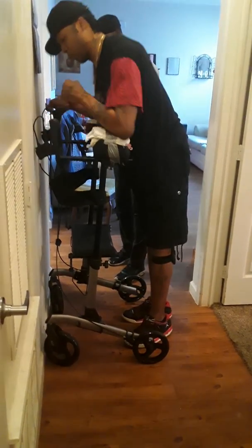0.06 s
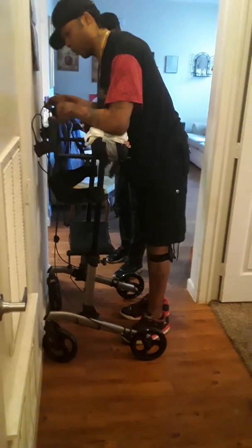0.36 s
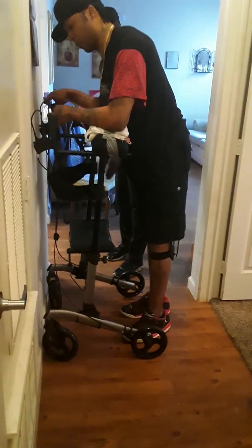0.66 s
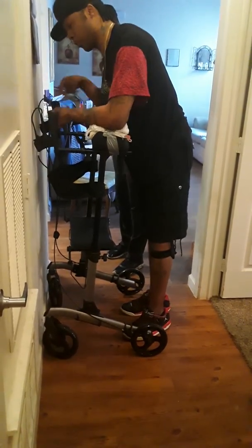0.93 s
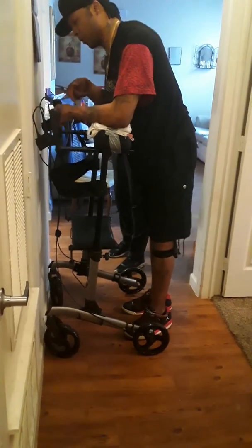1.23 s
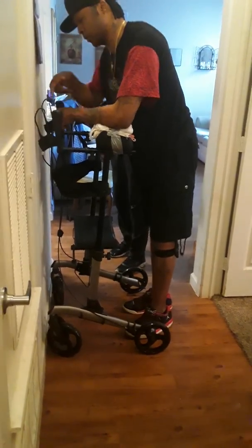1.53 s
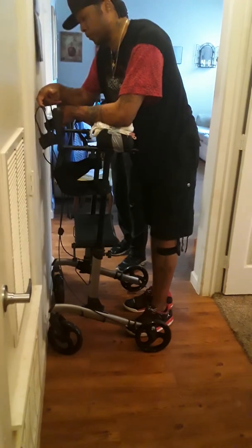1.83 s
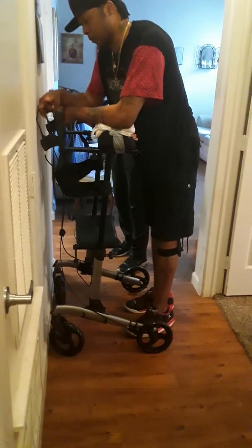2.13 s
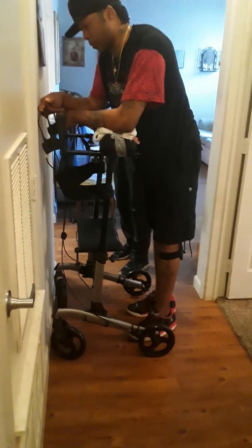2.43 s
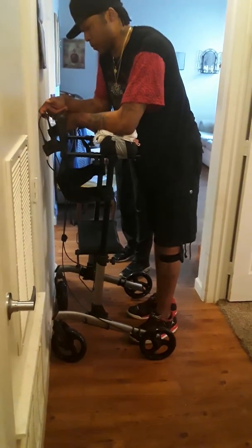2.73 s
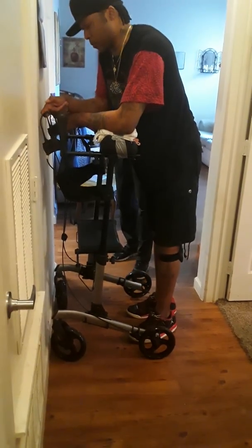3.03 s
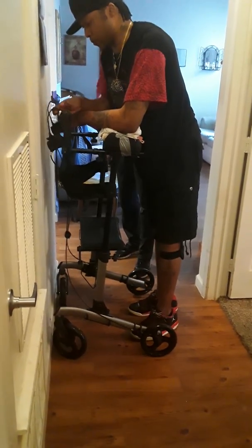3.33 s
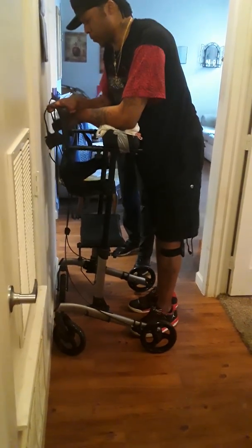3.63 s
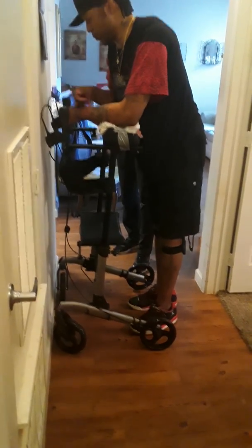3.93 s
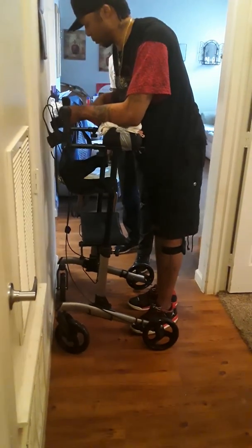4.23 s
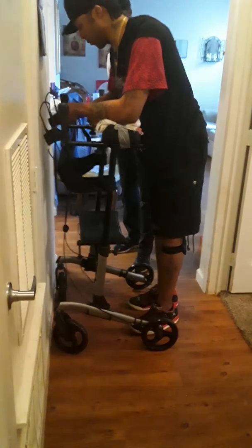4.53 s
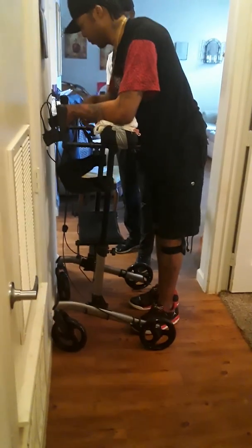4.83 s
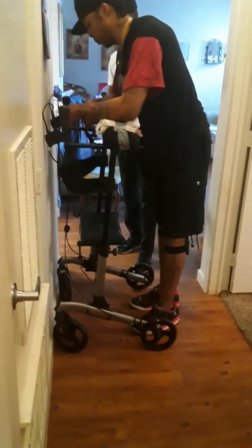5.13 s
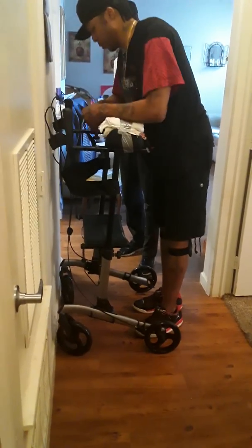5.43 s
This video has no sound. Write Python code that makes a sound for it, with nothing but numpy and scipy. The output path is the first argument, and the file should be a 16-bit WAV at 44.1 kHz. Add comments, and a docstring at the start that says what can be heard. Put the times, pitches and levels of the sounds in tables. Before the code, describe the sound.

A knock and thump on a wheeled walker open the scene, followed within a second by a strong clack of its latch. After a quiet stretch of small ticks and rustling cloth, the latch snaps crisply, and several softer knocks rattle the frame and thud into the wooden floor. The stereo microphone picks up short hallway reverberation and a faint, steady background of fan and electrical hum.

```python
"""A folding wheeled walker ticks, knocks and snaps as hands work its levers, post and latch.
Each impact excites a noisy clatter of small parts and the damped normal modes of tube frame and latch;
the wooden floor takes up the bass as a thump. A near wall reflects the clatter; the hallway reverberates.
Sleeves and fingers rustle by friction, over a faint fan, mains hum and the microphones' own noise."""
import sys
import numpy as np
from scipy import signal
from scipy.io import wavfile

SR = 44100
rng = np.random.default_rng(int(sys.argv[2]) if len(sys.argv) > 2 else 0)


def transcribe(u):
    """Save the signal u as a 16-bit wav file named by the first command-line argument.

    u: samples, shape (n,) or (channels, n), limited to [-1, 1]; the rate is SR.
    q: integer samples, one column per channel.
    """
    v = np.clip(np.atleast_2d(u).T, -1, 1)
    q = np.round(v * 32767).astype(np.int16)
    wavfile.write(sys.argv[1], SR, q)


N = 245637

# Impacts on the walker: t/s, level/dB, floor thump/dB, pitch of the part f/Hz,
# softness as treble fall/(dB per octave), rise time/s, ring that the hands allow/dB
IMPACTS = [(0.027, -29.5, -46, 1090, 6.5, 0.0038, -6), (0.046, -32.5, -28.5, 560, 4.5, 0.0013, -4.5),
           (0.09, -53, -35, 294, 1, 0.0031, -10), (0.595, -64, -54, 490, 2, 0.0029, -2),
           (0.888, -42, -57, 2840, 3.2, 0.0024, 0), (0.938, -22, -41, 345, 3, 0.0017, -1.5),
           (0.941, -26, -44, 1800, 7, 0.00056, -3.5), (1.807, -66, -54, 696, 1, 0.0037, -4),
           (1.826, -59.5, -49, 191, 3, .0064, 1), (1.893, -57.5, -59, 1400, 5.9, 0.0095, 0.5),
           (1.925, -61, -66, 400, 3.5, 0.0038, 0), (2.015, -65, -71, 2360, 19, 0.0049, 9.5),
           (2.165, -67, -65, 2000, -0.5, .0056, 0.5), (2.384, -59, -59, 2050, 4.5, 0.0013, 2),
           (2.392, -53.5, -51, 397, 9.5, 0.0021, -10.5), (2.412, -52, -53, 210, 7, 0.007, -3.5),
           (2.836, -64.5, -72, 3460, 1, 0.0067, 4), (2.874, -57.5, -68, 1020, 0.5, 0.003, -17),
           (2.878, -57, -76, 4770, 6, 0.0062, 0), (3.115, -53.5, -67, 980, 6, 0.0009, -2.5),
           (3.238, -64, -75, 1390, 5, 0.0032, 0), (3.351, -55.5, -61, 830, 6.5, .0015, 1.5),
           (3.861, -43, -63, 3340, 2, 0.0083, 2.5), (3.88, -27, -46, 1770, -0.4, 0.0013, -2),
           (3.89, -28, -36, 4140, -1, 0.0014, -1), (4.588, -36.5, -52, 760, 11, .001, -6.5),
           (4.621, -54.5, -67, 400, 2, .0052, -5), (4.654, -38, -38, 543, 7, 0.0039, -10),
           (4.728, -38, -31, 478, 6, 0.00071, -7), (4.757, -44.5, -36.5, 1190, 2.5, 0.0022, -4.5),
           (4.881, -55.5, -62, 2800, 21, 0.0033, -2.5), (4.943, -42.5, -63, 1111, 2.46, 0.00031, -4.5),
           (5.228, -62, -73, 3930, -5, 0.0028, -1), (5.487, -55.5, -58, 288, 4.5, 0.0077, 0)]
# Spectral density of the clatter: f/Hz, relative level/dB
CLATTER_SPECTRUM = [(30, -23), (55, 2.5), (92, -1.5), (145, -4), (200, 9.5), (340, 8.5), (600, 1.5),
                    (800, 2), (1100, 4), (1450, -2), (2000, 1.5), (3100, -1), (4100, -4.5), (5300, -7),
                    (8000, -12.5), (15000, -18)]
# Normal modes of tube frame (low) and latch (high): f/Hz, level/dB re the impact, T60/s
WALKER_MODES = [(137.8, -6.5, 0.32), (178.7, -15.5, 0.44), (206.6, -6, 0.4), (268.7, -3.5, 0.55),
                (306, -11, 0.5), (331, -7, 0.43), (374, -9, 0.29), (428.5, -11.5, 0.27), (570, -20, 0.4),
                (612, -15, 0.39), (675, -10.5, 0.3), (888, -10.5, 0.39), (1072, -12, 0.22),
                (1117, -15, 0.36), (1177, -16, 0.32), (1802, -10, 0.049), (1850, -17, 0.18),
                (1968, -16.5, 0.27), (1947, -18.5, 0.22), (2300, -8.5, 0.11), (2480, -15, 0.23),
                (3868, -19.5, 0.22), (3900, -29, 0.27), (4120, -9, 0.057), (4498, -12, 0.24),
                (7740, -19.5, 0.2), (8220, -23, 0.27)]
# Early decay of the small parts and near walls: f/Hz, T60/s
EARLY_DECAY = [(60, 0.2), (250, 0.4), (800, 0.29), (2500, 0.25), (7000, 0.26), (14000, 0.11)]
# Reverberation of the hallway: f/Hz, T60/s
HALLWAY_DECAY = [(60, 0.96), (250, 1), (800, 0.74), (2500, 1), (7000, 0.48), (14000, 0.48)]
# Build-up of the clatter, slowest in the bass: f/Hz, time constant/s
BUILD_UP = [(60, 0.013), (140, 0.012), (300, 0.0092), (800, 0.00022), (3000, 0.00044), (12000, 0.0017)]
# Likeness of the left and right channels: f/Hz, correlation coefficient
CORRELATION = [(60, .98), (150, .985), (250, .96), (370, .8), (550, .2), (1000, -.05), (2500, 0),
               (12000, 0)]
# Stereo balance of the walker: f/Hz, level left minus right/dB
BALANCE = [(100, 1), (400, -1), (1000, 2), (2000, -4), (4000, -3.5), (8000, 3.5), (13000, -2)]
# Arm movements, each a swell of rustle: centre t/s, duration/s, peak level/dB
ARM_SWELLS = [(0.51, 0.53, -57), (2.021, 0.29, -62.5), (2.66, 0.63, -79), (3.34, 0.33, -61.5),
              (4.76, 0.14, -52), (5.24, 0.35, -58)]
# Spectral density of rubbing cloth and skin: f/Hz, relative level/dB
RUSTLE_SPECTRUM = [(30, -12), (60, -5), (150, 2.5), (280, 2), (500, -2), (1000, -0.5), (2000, -6.5),
                   (3500, -4), (5500, -13.5), (8500, -23), (15000, -20.5)]
# Spectral density of the fan's rush: f/Hz, relative level/dB
FAN_SPECTRUM = [(30, -27), (55, -14), (110, -13.5), (170, -21.5), (250, 5), (380, -17.5), (520, -10),
                (1000, -16), (2500, -17), (4500, -26.5), (8500, -28), (12000, -26), (15500, -19.5)]
# Harmonics of the mains hum: f/Hz, level/dB
HUM_HARMONICS = [(120, -70.5), (240, -68.5), (360, -70), (480, -82)]

BAND_EDGES = np.geomspace(28, 16500, 24)   # f/Hz
BAND_HZ = np.sqrt(BAND_EDGES[1:] * BAND_EDGES[:-1])
TIME = np.arange(N) / SR
AGE = np.arange(int(.7 * SR)) / SR   # t/s since an impact
ONSET_SAMPLES = int(.05 * SR)   # an impact's level is set over this span


def clatter(gain_db=5, crack_db=5, crack_t60=0.018, hallway_db=-20):
    """Modal overlap: small parts ring as decaying noise, between a brief crack and the reverberant tail."""
    out, bands, envelopes = np.zeros((2, N)), noise_bands(), []
    colour = from_db(gain_db) * band_gains(CLATTER_SPECTRUM)
    for hz in BAND_HZ:
        early = decay(at_hz(EARLY_DECAY, hz))
        late = from_db(hallway_db) * decay(at_hz(HALLWAY_DECAY, hz))
        crack = from_db(crack_db) * decay(crack_t60)
        envelopes.append(stereo_gains(hz) * rise(at_hz(BUILD_UP, hz)) * (np.hypot(early, late) + crack))
    starts = rng.integers(0, N - len(AGE), len(IMPACTS))
    for start, (t, level_db, thump_db, pitch, softness, rise_s, _) in zip(starts, IMPACTS):
        sound, onset = 0, rise(rise_s)
        for hz, band, envelope, share in zip(BAND_HZ, bands, envelopes, colour):
            burst = band[:, start:start + len(AGE)] * envelope * onset
            gain = share * impact_gain(hz, level_db, thump_db, pitch, softness)
            sound = sound + gain * burst / rms(burst[:, :ONSET_SAMPLES])
        add(out, t, wall_reflection(part_resonance(sound, pitch)))
    return out


def frame_and_latch_modes(scatter_db=4.46, build_cycles=3.3, split_hz=5.06, twin_share=0.42):
    """Free vibration: each impact excites the damped normal modes, with random strength and phase."""
    out = np.zeros((2, N))
    chance = rng.standard_normal((len(IMPACTS), len(WALKER_MODES), 3))
    for k, (hz, mode_db, t60) in enumerate(WALKER_MODES):
        build_up = rise(build_cycles / hz)   # the blow takes a few cycles to spread through the frame
        beating = 1 + twin_share * np.exp(2j * np.pi * split_hz * AGE)   # a tube bends in two planes
        wave = np.exp(2j * np.pi * hz * AGE) * beating * build_up * decay(t60)
        wave = wave * stereo_gains(hz) / rms(wave.imag[:ONSET_SAMPLES])
        phase_spread = np.arccos(at_hz(CORRELATION, hz))   # reflections shift left against right
        for impact, (strength, phase, shift) in zip(IMPACTS, chance[:, k]):
            t, level_db, thump_db, pitch, softness, rise_s, ring_db = impact
            gain = impact_gain(hz, level_db, thump_db, pitch, softness)
            gain *= from_db(mode_db + ring_db + scatter_db * strength)
            angle = np.pi * phase + phase_spread * shift * np.array([[.5], [-.5]])
            add(out, t, gain * (np.exp(1j * angle) * wave).imag * rise(rise_s))
    return out


def impact_gain(hz, level_db, thump_db, pitch, softness, bass_db_per_octave=8.5, floor_hz=159):
    """Radiation is weak below a part's pitch, a soft touch excites little treble, the floor adds bass."""
    octaves = np.log2(hz / pitch)
    part = from_db(level_db + bass_db_per_octave * min(octaves, 0) - softness * max(octaves, 0))
    floor = from_db(thump_db) / np.hypot(1, (hz / floor_hz) ** 4)
    return np.hypot(part, floor)


def part_resonance(sound, hz, boost_db=2.5, q=12):
    """Resonance: the touched part favours frequencies near its own."""
    resonant = signal.lfilter(*signal.iirpeak(hz, q, fs=SR), sound)
    return sound + (from_db(boost_db) - 1) * resonant


def wall_reflection(sound, share=0.42, delay_range_s=(0.0011, 0.0042)):
    """Comb filtering: the near wall's echo interferes with the direct sound and makes it a little hollow."""
    lag = int(SR * rng.uniform(*delay_range_s))
    echo = np.pad(sound, ((0, 0), (lag, 0)))[:, :len(AGE)]
    echo = signal.sosfilt(signal.butter(2, 400, "high", fs=SR, output="sos"), echo)
    return (sound + share * echo) / np.hypot(1, share)


def rustle(finger_db=-64.5, pause_at_s=1.68, pause_s=0.27, grain_db=1.5, grain_hz=70):
    """Friction: cloth and skin slip unevenly; arm movements swell over fingers that pause only once."""
    fingers = from_db(finger_db) * (1 - bell_curve(pause_at_s, pause_s))
    arm_power = sum(from_db(db) ** 2 * bell_curve(t, length) for t, length, db in ARM_SWELLS)
    envelope = np.sqrt(fingers ** 2 + arm_power)
    return shaped_noise(RUSTLE_SPECTRUM) * envelope * from_db(grain_db * drift(grain_hz))


def fan(level_db=-65.5):
    """Broadband flow noise: a fan moves the air with a soft, steady rush."""
    return from_db(level_db) * shaped_noise(FAN_SPECTRUM)


def mains_hum(waver_db=2.05, waver_hz=3.79):
    """Harmonic series: the mains hums in four partials, each wavering slightly in level."""
    hum = 0
    for hz, db in HUM_HARMONICS:
        amplitude = np.sqrt(2) * from_db(db + waver_db * drift(waver_hz))
        hum = hum + amplitude * np.sin(2 * np.pi * (hz * TIME + rng.random()))
    return hum


def microphone_noise(level_db=-72, band_hz=(55, 328)):
    """Self-noise: each capsule adds an independent, faint low rush."""
    white = rng.standard_normal((2, N))
    rush = signal.sosfilt(signal.butter(2, band_hz, "band", fs=SR, output="sos"), white)
    return from_db(level_db) * rush / rms(rush)


def noise_bands():
    """Partial coherence: stereo noise bands of unit rms, alike left and right only in the bass."""
    white, bands = rng.standard_normal((2, 2, N)), []
    for k, hz in enumerate(BAND_HZ):
        bandpass = signal.butter(2, BAND_EDGES[k:k + 2], "band", fs=SR, output="sos")
        mid, side = signal.sosfilt(bandpass, white[k % 2])
        alike = at_hz(CORRELATION, hz)
        band = np.sqrt(1 + alike) * mid + np.sqrt(1 - alike) * side * np.array([[1], [-1]])
        bands.append(band / rms(band))
    return bands


def band_gains(spectrum):
    """Band power is spectral density times bandwidth; the gains are scaled to a total power of 1."""
    gain = from_db(at_hz(spectrum, BAND_HZ)) * np.sqrt(np.diff(BAND_EDGES))
    return gain / np.linalg.norm(gain)


def shaped_noise(spectrum):
    """Spectral shaping: a weighted sum of noise bands."""
    return sum(gain * band for gain, band in zip(band_gains(spectrum), noise_bands()))


def rise(time_constant):
    """Exponential approach to full amplitude."""
    return 1 - np.exp(-AGE / time_constant)


def decay(t60):
    """Exponential damping: a fall of 60 dB in t60."""
    return np.exp(-np.log(1000) * AGE / t60)


def bell_curve(centre, width):
    """Gaussian pulse in time, with its full width taken at 1/e."""
    return np.exp(-(2 * (TIME - centre) / width) ** 2)


def drift(rate_hz):
    """Random fluctuation with a spread of about 1."""
    return np.interp(TIME * rate_hz, np.arange(2000), rng.standard_normal(2000))


def stereo_gains(hz):
    """Level difference, split evenly between left and right."""
    return from_db(at_hz(BALANCE, hz) * np.array([[.5], [-.5]]))


def at_hz(table, hz):
    """Interpolation on a logarithmic frequency axis."""
    f, value = np.transpose(table)
    return np.interp(np.log(hz), np.log(f), value)


def from_db(db):
    """Amplitude ratio of a level."""
    return 10 ** (np.asarray(db) / 20)


def rms(x):
    """Root-mean-square amplitude."""
    return np.sqrt(np.mean(x ** 2) + 1e-24)


def add(out, t, sound):
    """Superposition of a sound that starts at time t."""
    start = round(t * SR)
    out[:, start:start + sound.shape[1]] += sound[:, :N - start]


def scene():
    """Superposition of the walker, the rustle and the hallway's background."""
    return clatter() + frame_and_latch_modes() + rustle() + fan() + mains_hum()


def record(dry, cutoff_hz=15900):
    """Band limiting: sound and microphone noise pass through a steep low-pass filter."""
    lowpass = signal.ellip(10, .1, 80, cutoff_hz, fs=SR, output="sos")
    return signal.sosfilt(lowpass, dry + microphone_noise())


dry = scene()
out = record(dry)
transcribe(out)
```